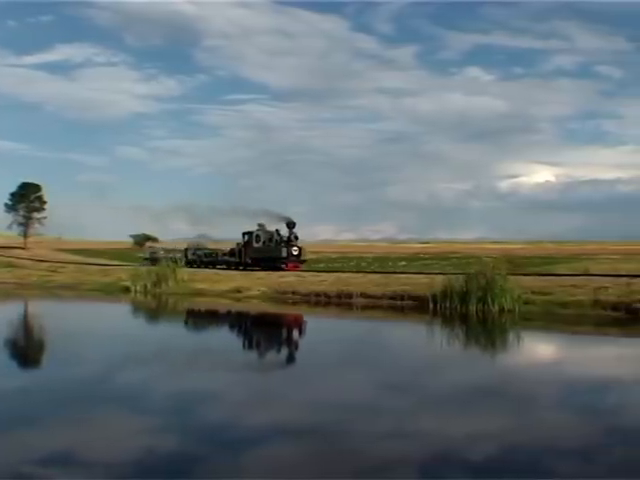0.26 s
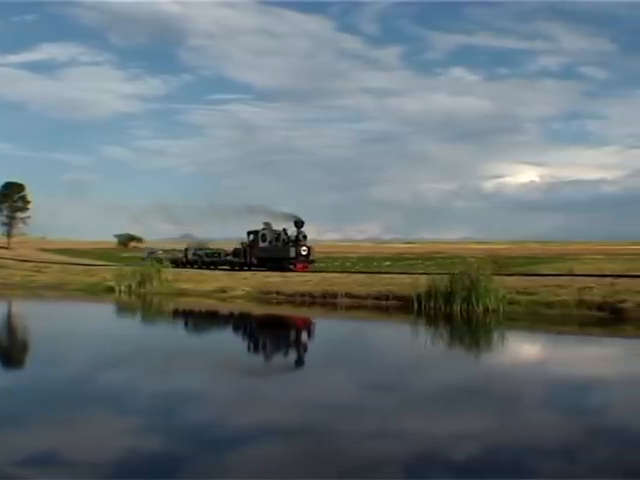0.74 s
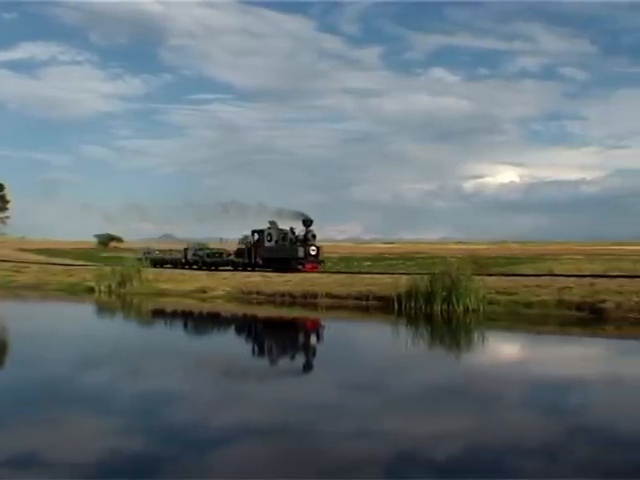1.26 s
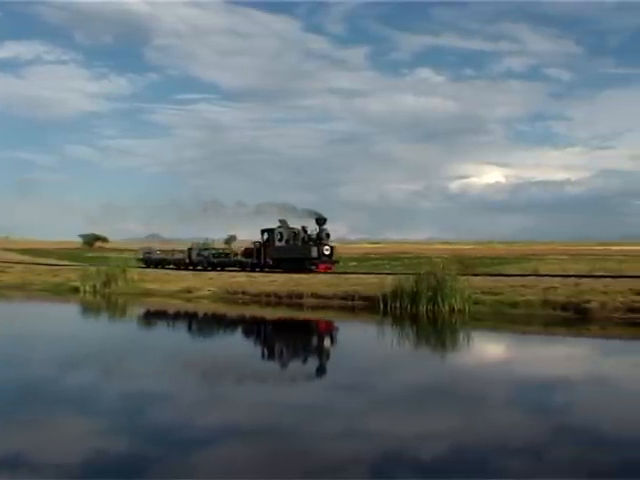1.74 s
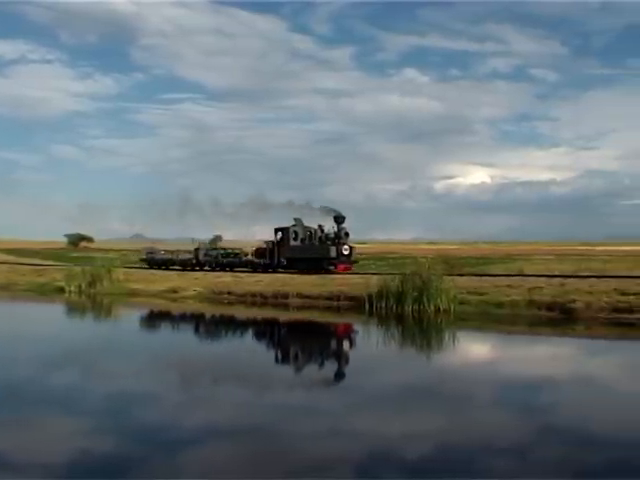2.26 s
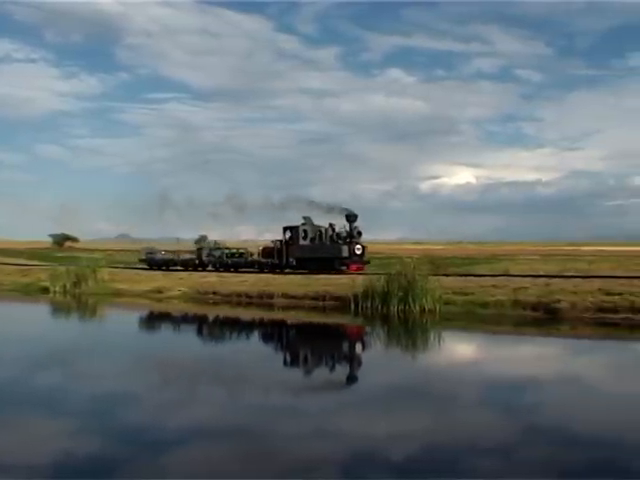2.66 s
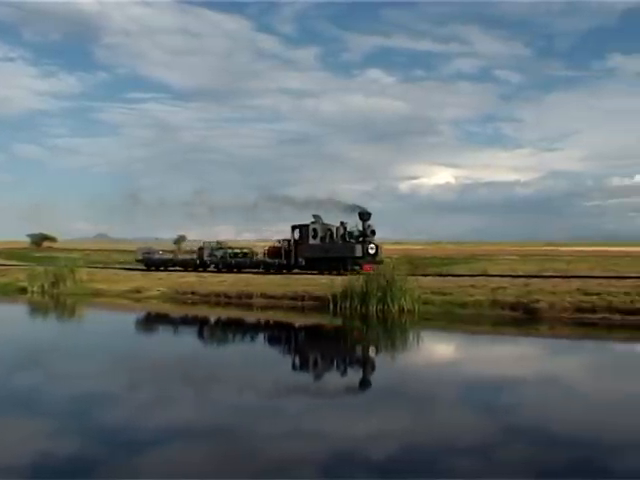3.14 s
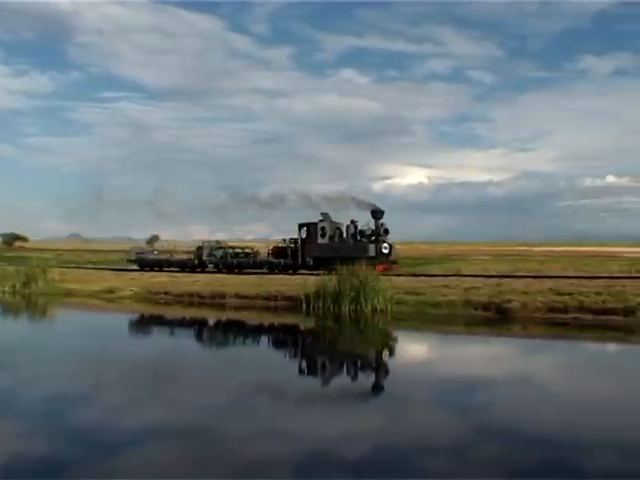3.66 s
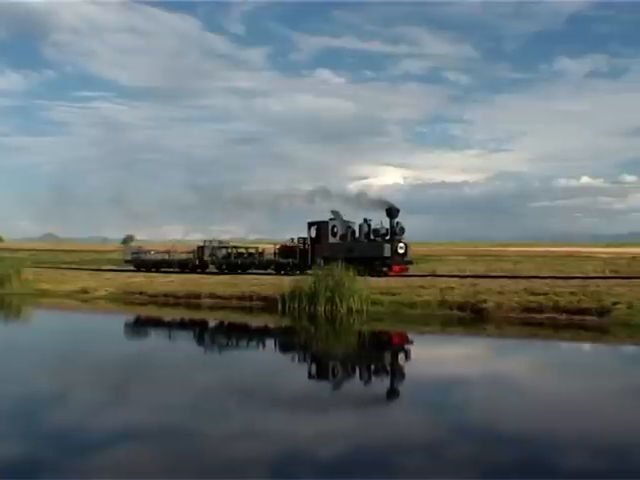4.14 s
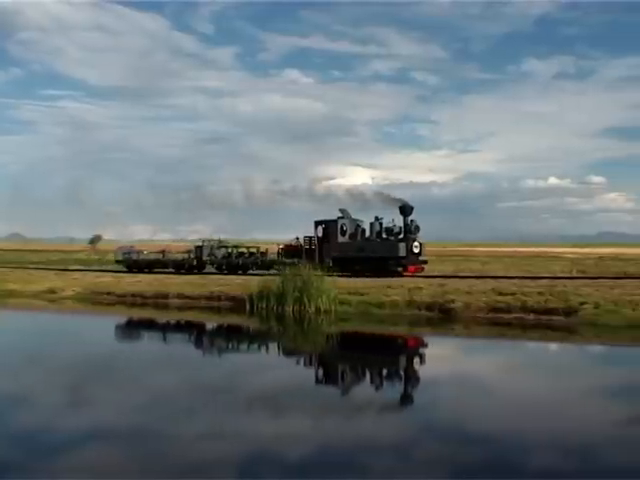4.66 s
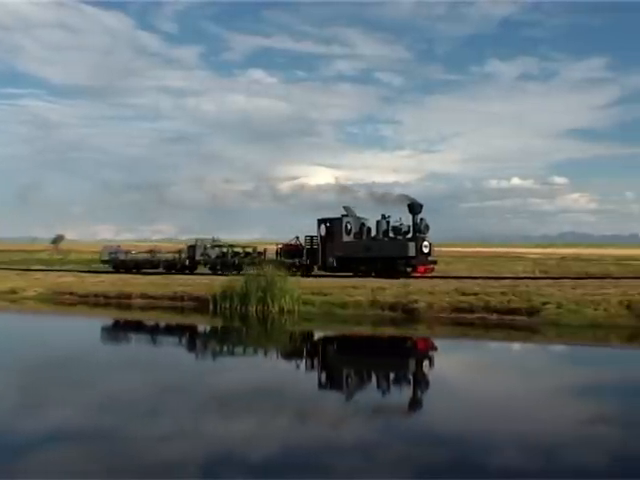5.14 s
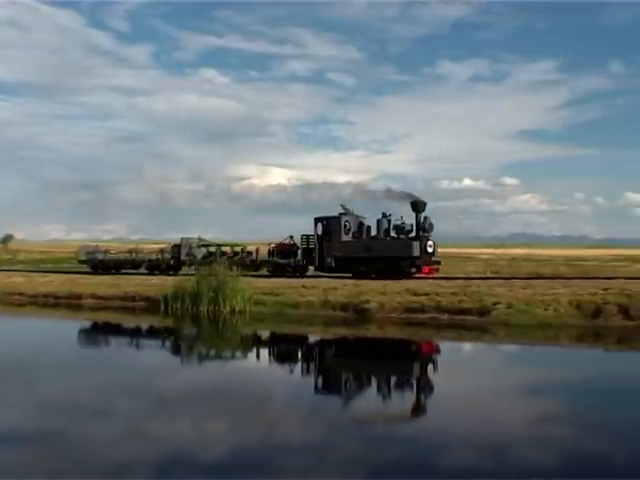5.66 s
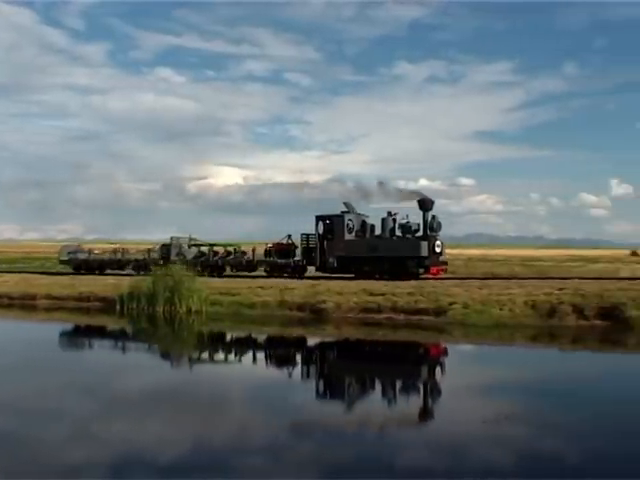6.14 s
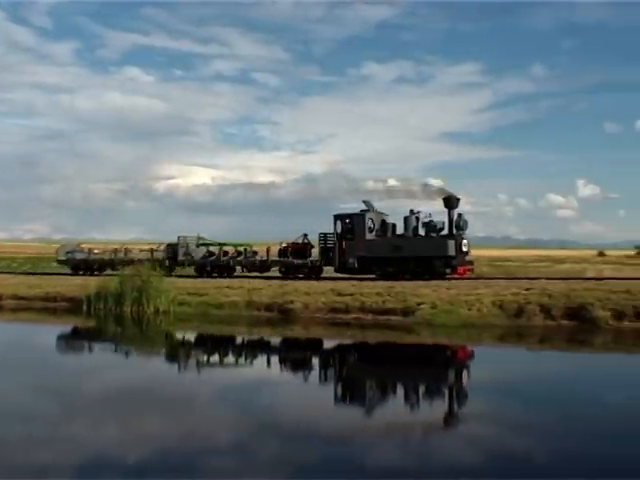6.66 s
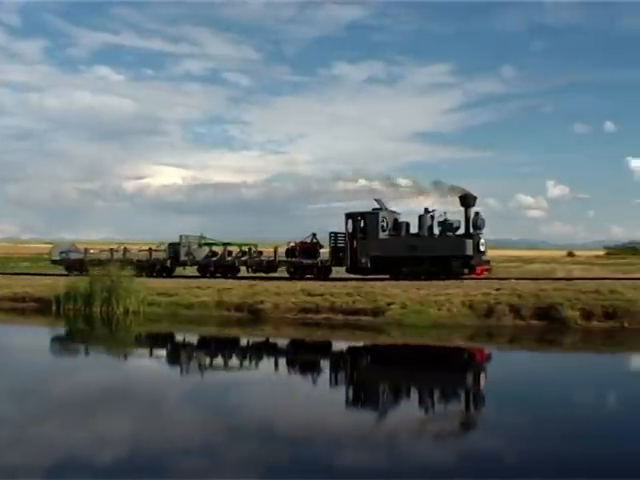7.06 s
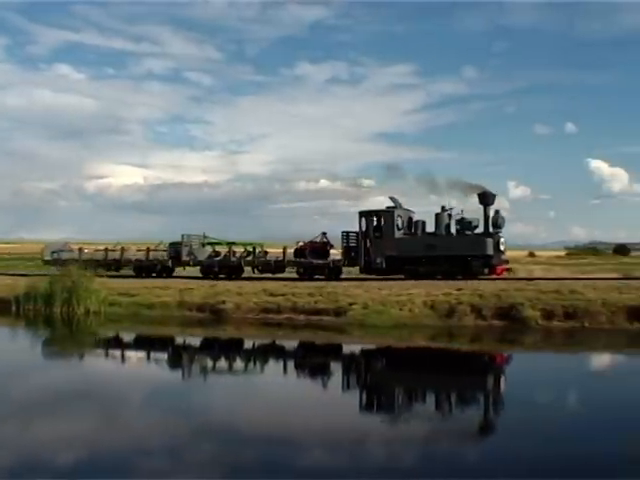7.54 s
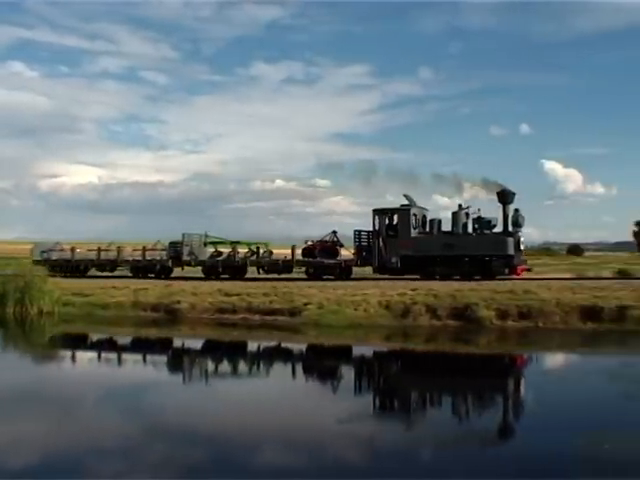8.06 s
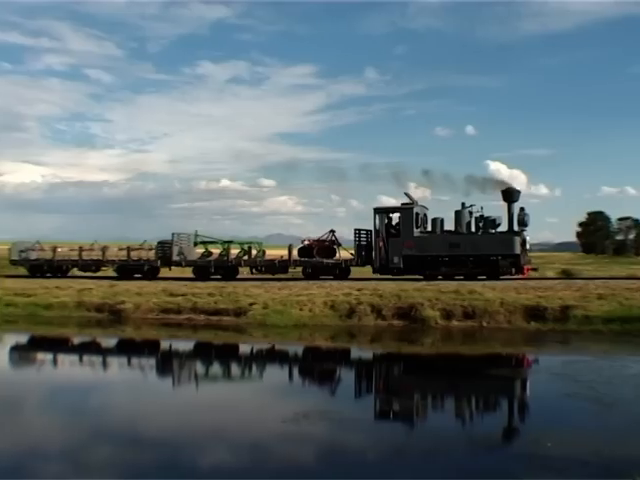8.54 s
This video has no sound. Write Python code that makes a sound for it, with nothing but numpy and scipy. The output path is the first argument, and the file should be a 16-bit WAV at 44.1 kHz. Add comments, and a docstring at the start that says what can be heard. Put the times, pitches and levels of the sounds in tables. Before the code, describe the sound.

Wagons rumble, rattle and knock over rail joints across a pond; one nearly four-second steam whistle blasts, cracking upward three times, then stops abruptly.

```python
"""Open ground, across a pond from a narrow-gauge line: a steam train rolls closer to the microphone.
One long steam whistle is a stack of gliding sine partials in a rush of coloured noise; harder pulls on
the cord overblow it three times into a higher, shriller note, while the gain turns everything down.
Wagons rumble as swelling noise, knock on rail joints as blows to resonant frames, and scrape.
A thin high hiss strengthens, far echoes trail the whistle, and the wagons clatter on after it."""
import sys
import numpy as np
from scipy import signal
from scipy.fft import rfft, irfft, next_fast_len
from scipy.io import wavfile
from scipy.ndimage import uniform_filter1d, minimum_filter1d, map_coordinates

SR = 44100
rng = np.random.default_rng(int(sys.argv[2]) if len(sys.argv) > 2 else 0)


def store_pcm(level_fs):
    """Save levels as 16-bit WAV."""
    pcm = np.round(np.clip(level_fs, -1, 1) * 32767).astype(np.int16)
    wavfile.write(sys.argv[1], SR, np.atleast_2d(pcm).T)


N = 388080

# plain note before scoop and bends, wavering slightly: (time [s], pitch [Hz])
PLAIN_PITCH = [(4.38, 1272), (4.5, 1266), (4.62, 1309), (4.7, 1285), (4.93, 1309), (5.06, 1306),
               (5.3, 1296), (5.62, 1280), (6.12, 1293), (6.25, 1285), (6.31, 1303), (6.5, 1287),
               (6.66, 1288), (6.85, 1288), (7.06, 1290), (7.36, 1304), (7.6, 1298), (7.9, 1299)]
# plain note, its strength passing to the octave and back:
# (time [s], fundamental [dB], octave [dB], twelfth [dB])
PLAIN_PARTIALS = [(4.36, -6, -32, -43), (4.6, -8, -30.5, -38.5), (4.85, -8, -38.5, -32.5),
                  (5.05, -8, -36.5, -44.5), (5.38, -9, -30, -27), (5.5, -12.5, -37.5, -29.5),
                  (5.7, -11, -26.5, -23.5), (6.05, -10, -27.5, -29), (6.42, -11.5, -25.5, -29.5),
                  (6.58, -10.5, -19, -35), (6.76, -22.5, -19.5, -33), (7.04, -20.5, -17, -34),
                  (7.1, -9.5, -16, -28.5), (7.36, -20, -22, -34), (7.58, -18.5, -20.5, -38),
                  (7.8, -11, -20, -24), (7.92, -9, -25, -39), (8.1, -10.5, -31, -31.5)]
# harder pulls on the cord, bending the note up until it overblows:
# (start [s], top [s], end [s], bend [Hz], overblown from [s], overblown until [s],
#  hoarseness before the flip [dB], added steam rush [dB], added fizz [dB])
PULLS = [(5.635, 5.87, 6.04, 76, 5.778, 5.962, 6, 2.5, -2),
         (7.07, 7.262, 7.325, 124, 7.11, 7.312, -1, 1, 10.5),
         (7.895, 8.025, 8.112, 121, 7.928, 8.096, -6, -1, 11.5)]
# higher modes of the pipe: (centre [Hz], half width [Hz], level [dB])
UPPER_MODES = [(5530, 440, -29), (6730, 330, -31), (8220, 280, -35.5), (9540, 170, -37.5),
               (11040, 270, -42.5), (12550, 320, -46.5), (13600, 320, -50), (15300, 400, -56)]
# hoarse skirts round the third mode: (offset [Hz], relative level per Hz [dB])
EDDIES = [(20, -6.0), (100, 4), (280, -13), (480, 0), (900, -24), (3000, -81)]
# colour of the steam stirring the pipe's lowest resonance: (frequency [Hz], relative level per Hz [dB])
BREATHY_COLOUR = [(100, -72), (500, -35), (750, -26.5), (900, -8.5), (1050, 1.5), (1200, 2.5), (1400, -0.5),
                  (1600, -7), (1800, -19), (2300, -30), (5000, -91)]
# colour of the steam jet over the lip: (frequency [Hz], relative level per Hz [dB])
JET_COLOUR = [(60, -43), (600, -3), (1300, 7), (2000, -2), (2500, 3.5), (3100, -1.5), (3700, 2),
              (4400, 1.5), (5100, -4), (6000, -1.5), (7000, -11), (7900, -8), (8900, -31.5), (15000, -72)]
# colour of the steam's top fizz and of the far treble: (frequency [Hz], relative level per Hz [dB])
FIZZ_COLOUR = [(1000, -61), (4000, -25), (7000, -5.5), (8100, 8.5), (8950, -1), (9750, 5), (10500, -5),
               (11400, 3), (12200, -6.5), (13300, -1.5), (14400, -13), (15700, -17)]
# the steam's top fizz, before the pulls add to it: (time [s], level [dB])
FIZZ_LEVEL = [(4.39, -55.5), (4.65, -53.5), (4.77, -47.5), (5.05, -46), (5.2, -55), (5.32, -42.5),
              (5.5, -51.5), (5.72, -39.5), (6.08, -49.5), (6.4, -46.5), (6.85, -48.5), (7.03, -41.5),
              (7.6, -45), (8.1, -46)]
# ground bounce, lagging more as the engine nears: (time [s], lag [ms])
GROUND_LAG = [(4.3, 0.845), (5.0, 0.91), (5.9, 1.029), (6.7, 1.125), (7.6, 1.197), (8.1, 1.255)]
# low thumps of the gain control while the whistle sounds: (time [s], 1/e half length [s], level [dB])
GAIN_THUMPS = [(4.36, 0.036, -41), (4.582, .05, -40), (4.73, 0.088, -38.5), (5.018, 0.092, -41),
               (5.328, .06, -46), (5.76, 0.055, -39.5), (5.99, 0.055, -46), (6.201, 0.041, -56),
               (6.6, .04, -56), (7.103, 0.043, -40), (7.27, .05, -46), (7.94, 0.059, -44)]
# colour of the gain control's thumps: (frequency [Hz], relative level per Hz [dB])
GAIN_THUMP_COLOUR = [(10, -1.5), (25, 5), (55, -4.5), (100, -9.5), (200, -30), (1000, -92)]
# changing level of the rolling, dipping just after the first overblow, before lurches and jolts:
# (time [s], rumble [dB], clatter [dB], hiss [dB])
ROLLING_LEVELS = [(0, -35.5, -40.5, -47), (1.0, -36, -38.5, -47.5), (1.6, -34.5, -38.5, -44),
                  (2.3, -32.5, -39, -43.5), (3.5, -34, -40.5, -43.5), (4.3, -33, -38, -41.5),
                  (5.1, -34.5, -38.5, -35.5), (5.6, -32, -36.5, -39), (6.0, -34.5, -41, -56),
                  (6.6, -31.5, -39.5, -37), (7.5, -33, -46, -37.5), (8.2, -35, -42.5, -39.5),
                  (8.8, -32.5, -42, -41.5)]
# lurches that swell the rolling: (time [s], 1/e half length [s], rumble [dB], clatter [dB], hiss [dB])
LURCHES = [(.005, 0.02, 8.5, 3, 7.5), (0.085, 0.032, 2, 6.5, -5), (0.397, .03, 2, 0, 2),
           (0.622, 0.055, 3.5, 3.5, 3.5), (0.83, 0.057, 2.5, -0.5, 2.5), (1.23, 0.08, 4, -0.5, 2.5),
           (1.352, 0.02, 1, 7.5, 3.5), (1.455, 0.04, 4.5, 7.5, 6), (1.655, 0.021, 2, 8, 5),
           (2.331, .018, 1, 10, 1.5), (2.55, 0.036, 1.5, 4.5, 0.5), (2.78, 0.011, 5, 0, 1.5),
           (3.068, 0.026, 4, 6.5, 5.5), (3.19, 0.033, 5, 5, 0.5), (3.793, 0.072, 2, 2, 3.5),
           (4.41, 0.016, 4, -6, 5), (5.71, .03, 4, -5, 0), (7.372, .02, 5, 5, -1),
           (7.483, 0.032, 5, -7, -3), (8.427, 0.024, 4, 4, 8.5), (8.575, 0.038, 0.5, -1, 1.5)]
# colour of the wheels' rumble: (frequency [Hz], relative level per Hz [dB])
RUMBLE_COLOUR = [(10, -81), (30, -51.5), (60, -34.5), (100, -19), (160, -10), (240, -2), (330, 0.5),
                 (450, -4.5), (600, -7.5), (900, -15.5), (1600, -54), (5000, -100)]
# colour of the wagons' clatter: (frequency [Hz], relative level per Hz [dB])
CLATTER_COLOUR = [(40, -76), (300, -19), (550, 2), (800, 4.5), (1150, 1.5), (1450, -10), (2000, -13),
                  (3200, -39), (9000, -76.5)]
# colour of the rolling hiss: (frequency [Hz], relative level per Hz [dB])
HISS_COLOUR = [(60, -80), (1200, -1), (2000, 0), (2550, 0), (3200, -2), (3900, -5.5), (4500, -3.5),
               (5600, -10.5), (6300, -13.5), (7200, -25), (7950, -25), (8700, -31), (9700, -32.5),
               (15500, -44)]
# rattling steel fittings: (centre [Hz], width [Hz], relative level [dB])
FITTINGS = [(2450, 170, -3.5), (3824, 130, -2), (4210, 160, -6.5), (5200, 57, -6), (6180, 81, -9.5),
            (7960, 170, -22), (9400, 450, -35)]
# wheels on rail joints: (time [s], knock level [dB], clank relative to the thud [dB])
JOINTS = [(0.002, -33, -10), (0.08, -22.5, -12), (0.8, -20, -6), (1.008, -27.5, -19), (1.16, -20.5, -12),
          (1.425, -25, -5), (1.556, -20, -6), (1.633, -23.5, -3), (2.097, -28, 3.5), (2.175, -24.5, -6),
          (2.304, -21.5, -1), (2.386, -22.5, -3), (2.754, -26, -16), (2.908, -27, 0.5), (2.957, -24, -1.5),
          (3.037, -26.5, -6.5), (3.174, -19, -4.5), (3.26, -24.5, 0), (3.732, -15.5, -12),
          (3.819, -22.5, -2), (4.042, -23, -3), (4.275, -22, -17), (5.507, -27, 7), (6.17, -20, -8.5),
          (6.638, -22, -10), (7.357, -15, -9), (7.604, -14.5, -11), (8.377, -14.5, -6), (8.638, -17.5, -5)]
# wagon frame resonances: (centre [Hz], width [Hz], relative level [dB])
WAGON_FRAME = [(215, 40, -2.5), (277, 42, 3), (367, 82, -0.5), (448, 107, -2.5), (666, 150, -11)]
# colour of the steel clank: (frequency [Hz], relative level per Hz [dB])
CLANK_COLOUR = [(30, -69), (300, -24), (600, 5), (1100, 5.5), (1600, -9), (2600, -9.5), (4500, -11),
                (6500, -23.5), (9000, -50), (15000, -60)]
# short scrapes of steel: (time [s], 1/e half length [s], centre [Hz], width [octaves], level [dB])
SCRAPES = [(0.329, 0.016, 5400, 0.23, -38), (1.321, 0.0088, 4250, .3, -36),
           (1.449, 0.022, 3440, 0.53, -37.5), (1.556, 0.0069, 5570, 0.2, -42),
           (1.845, 0.012, 4900, 0.25, -41), (2.074, 0.018, 4750, .2, -40), (2.458, 0.018, 4600, 0.32, -40),
           (3.31, .02, 6960, .03, -58), (8.431, 0.022, 2700, 0.98, -42), (8.452, .016, 7950, 0.028, -51)]
# thin high hiss, stronger as the train nears: (time [s], level [dB])
FAR_TREBLE_LEVEL = [(0, -84.5), (4.3, -78), (8.2, -59.5), (8.8, -62)]
# far echoes over the open ground: (frequency [Hz], decay by 60 dB [s])
FIELD_DECAY = [(200, .3), (1300, 0.92), (2700, 0.62), (4100, 0.62), (6000, .3), (12000, .2)]

OPEN_S, SHUT_S = 4.336, 8.113  # the whistle valve
BUILD_S = 0.18  # time constant of the pressure building in the steam
SCOOP_HZ, SCOOP_S = 322.8, 0.011  # the note starts flat and scoops up: depth, time constant
SETTLE_HZ, SETTLE_S = 44.62, 0.05  # then creeps the rest of the way
FLIP_S, LOCK_HZ = 0.0032, 14  # time scale of the register flip; the overblown note locks a little flat
THIRD_HZ, THIRD_WIDTH_HZ, THIRD_DB = 4042, 232, -10  # third mode: centre, half width, level when in tune
# overblown: the fundamental, what the third mode takes from it in tune, the octave in tune
FIRST_DB, ROBBED_DB, OCTAVE_DB = -5, 11, -27.5
BRIGHT_HZ, BRIGHT_DB_PER_HZ = 1385, 0.013  # overblown: neutral pitch; gain per Hz above it and per partial
SURGE_DB = 9  # pipe and steam gain this much when overblown, ahead of the gain control
BREATHY_DB, JET_DB = -23.5, -26.5  # the steam at full pressure, before its swings
BREAK_LEAD_S, BREAK_S = 0.025, 0.043  # hoarseness peaks just before the flip; its 1/e half length
SPILL = 0.14  # dB of extra jet noise for each dB that the fundamental falls short of
FULL_DB = -12.5  # this level, at which the pipe takes up the whole jet
TOP_HZ = 15740  # upper band limit


def pipe(jitter_hz=4.55, flutter=0.022, upper_flutter=0.36, plain_db=-7, plain_tilt_db=-5.0):
    """The pipe's note; the turbulent jet shakes its pitch and its strength."""
    pitch, shrill = pipe_pitch(), overblow()
    first, second, third = partials(pitch, shrill)
    shaken_pitch = pitch + jitter_hz * wobble(220) + 2.495 * wobble(30)
    phase = 2 * np.pi * np.cumsum(shaken_pitch) / SR
    # the weaker the note, the more the steam unsettles it
    tone = (first + flutter * wobble(70)) * np.sin(phase)
    tone += second * amp(0.66 * wobble(90)) * np.sin(2 * phase)
    tone += third * amp(wobble(90)) * np.sin(3 * phase + 0.14 * wobble(400))
    # upper partials grow as the pressure builds and light up as they glide through the higher modes
    pressure_db = np.interp(clock(), [OPEN_S, 5.3], [-13, 0])
    bright_db = shrill * BRIGHT_DB_PER_HZ * (pitch - BRIGHT_HZ)
    for step, k in enumerate(range(4, 12)):
        modes = sum(amp(db) / (1 + ((k * pitch - hz) / width) ** 2) for hz, width, db in UPPER_MODES)
        tilt_db = (1 - shrill) * (plain_db + plain_tilt_db * step)
        drift_db = 2.5 * wobble(22)
        level = modes * amp(pressure_db + tilt_db + bright_db * step + drift_db)
        tone += level * (1 + upper_flutter * wobble(200)) * np.sin(k * phase + 0.44 * wobble(260))
    return np.sqrt(2) * (tone + unrest(phase)) * valve()


def pipe_pitch():
    """The note scoops up at the start and arches with every harder pull."""
    plain = curves(PLAIN_PITCH)[0] - SCOOP_HZ * settling(SCOOP_S) - SETTLE_HZ * settling(SETTLE_S)
    bends = 0
    for start, top, end, bend_hz, *_ in PULLS:
        pull = np.interp(clock(), [start, top, end], [0, 1, 0])
        bends = bends + bend_hz * np.sin(np.pi / 2 * pull)
    return plain + bends - LOCK_HZ * overblow()


def partials(pitch, shrill):
    """Lowest three strengths; the better the third mode is in tune, the more it robs the fundamental."""
    plain = amp(curves(PLAIN_PARTIALS))
    in_tune = 1 / (1 + ((3 * pitch - THIRD_HZ) / THIRD_WIDTH_HZ) ** 2)
    first = amp(FIRST_DB - ROBBED_DB * in_tune)
    blown = np.array([first, amp(OCTAVE_DB) * np.sqrt(in_tune), amp(THIRD_DB) * in_tune])
    return (1 - shrill) * plain + shrill * blown


def overblow():
    """0 for the plain note, 1 when the pipe's third mode takes over."""
    return sum(overblown(*pull[4:6]) for pull in PULLS)


def overblown(start, end):
    """1 while the pipe's third mode holds the note, 0 before and after."""
    return (np.tanh((clock() - start) / FLIP_S / 2) - np.tanh((clock() - end) / FLIP_S / 2)) / 2


def unrest(phase, warble_db=-30, croak_db=-28, undertone_db=-34):
    """Half-pitch tone as the pipe starts to speak; hoarse skirts as the third mode catches and holds."""
    speaking = np.interp(clock(), [OPEN_S, 4.42, 4.5], [1, 1, 0])
    undertone = amp(undertone_db) * speaking * (1 + 0.3 * wobble(60)) * np.sin(phase / 2)
    croak = 0
    for *_, start, end, break_db, rush_db, fizz_db in PULLS:
        croak = croak + amp(croak_db + break_db) * swell(start - BREAK_LEAD_S, BREAK_S)
    # low noise times the third partial makes skirts on both sides of it
    return undertone + (amp(warble_db) * overblow() + croak) * noise(EDDIES) * np.sin(3 * phase)


def valve(rise=0.016, fall=0.024):
    """The whistle valve snaps open and shut."""
    return np.clip((clock() - OPEN_S) / rise, 0, 1) * np.clip((SHUT_S - clock()) / fall, 0, 1)


def settling(seconds):
    """1 as the valve opens, dying away afterwards."""
    return np.exp(-np.maximum(clock() - OPEN_S, 0) / seconds)


def steam(breathy_lack_db=12, jet_lack_db=13, breathy_loss_db=5.0, drift_db=1.16):
    """The jet rushes over the lip and stirs the lowest resonance; what the note leaves spills as noise."""
    lack = settling(BUILD_S)
    spill_db = SPILL * np.maximum(FULL_DB - curves(PLAIN_PARTIALS)[0], 0)
    flow_db = drift_db * wobble(9)
    fizz_db, = curves(FIZZ_LEVEL)
    hoarse_db = 0
    for *_, start, end, break_db, rush_db, sizzle_db in PULLS:
        shrill = overblown(start, end)
        hoarse_db = hoarse_db + break_db * swell(start - BREAK_LEAD_S, BREAK_S)
        flow_db = flow_db + rush_db * shrill
        fizz_db = fizz_db + sizzle_db * shrill
    breathy_db = BREATHY_DB - breathy_lack_db * lack + flow_db - breathy_loss_db * overblow()
    jet_db = JET_DB - jet_lack_db * lack + flow_db + spill_db + hoarse_db
    breathy = amp(breathy_db) * patchy(noise(BREATHY_COLOUR), depth_db=0.5)
    jet = amp(jet_db) * patchy(noise(JET_COLOUR), depth_db=2.03)
    fizz = amp(fizz_db) * patchy(noise(FIZZ_COLOUR), depth_db=0.7)
    return bounced(breathy + jet + fizz) * valve()


def bounced(x, strength=0.66):
    """Direct sound plus its ground bounce: a comb of notches slides down as the engine nears."""
    lag_ms, = curves(GROUND_LAG)
    late = map_coordinates(x, [np.arange(N) - lag_ms * SR / 1000])
    return (x + strength * late) / np.hypot(1, strength)


def rolling(rattles=70, rattle_db=-6.0):
    """Wheels rumble through the wagon frames; loose fittings, tapped at random, rattle over a hiss."""
    lurch_db = sum(np.outer(dbs, swell(s, length)) for s, length, *dbs in LURCHES)
    rumble_db, clatter_db, hiss_db = curves(ROLLING_LEVELS) + lurch_db
    jolt = wobble(45)  # bumps in the track shake everything together
    rumble = amp(rumble_db + 0.71 * jolt) * patchy(noise(RUMBLE_COLOUR), depth_db=0.3)
    clatter_db = clatter_db + 2.3 * jolt + 1.2 * wobble(160)
    clatter = amp(clatter_db) * patchy(noise(CLATTER_COLOUR), depth_db=-0.5)
    # rattles: mean taps per second
    taps = (rng.random(N) < rattles / SR) * amp(0.96 * rng.standard_normal(N))
    tap_decay = np.exp(-clock()[:SR // 10] / 0.011)
    chatter = signal.fftconvolve(taps, tap_decay)[:N] * rng.standard_normal(N)
    hiss = patchy(noise(HISS_COLOUR), depth_db=1.74) * amp(0.61 * jolt + 1.57 * wobble(180))
    hiss += amp(rattle_db) * unit(ring(chatter, FITTINGS))
    return rumble + clatter + amp(hiss_db) * hiss


def joints(thud_t60=0.09, clank_t60=0.14, blow=6.5, low_hz=110):
    """Each wheel drops into a joint: one hard blow, then the frame shudders and the steel clanks."""
    blows, thud, clank = np.zeros((3, N))
    for s, db, clank_db in JOINTS:
        start = max(round(s * SR), 0)
        t = clock()[:min(SR // 3, N - start)]
        blows[start] = amp(db) * blow
        thud[start:start + len(t)] += amp(db - 60 * t / thud_t60)
        clank_rise = 1 - np.exp(-t / 0.0015)
        clank[start:start + len(t)] += amp(db + clank_db - 60 * t / clank_t60) * clank_rise
    white = rng.standard_normal(N)
    body = ring(blows + amp(-3.5) * thud * white, WAGON_FRAME) / np.std(ring(white, WAGON_FRAME))
    # the frame radiates only its middle range
    body = filtered(body, lambda hz: (1j * hz / (low_hz + 1j * hz)) ** 2 / (1 + 1j * hz / 2500))
    return body + amp(-3.5) * clank * noise(CLANK_COLOUR)


def scrapes():
    """Steel rubs on steel in short, bright strokes of band noise."""
    out, hz = np.zeros(N), np.fft.rfftfreq(SR, 1 / SR)
    for s, length, centre_hz, octaves, db in SCRAPES:
        response = np.exp(-0.5 * (np.log2((hz + 1) / centre_hz) / octaves) ** 2)
        band = irfft(rfft(rng.standard_normal(SR)) * response)
        out += amp(db) * np.resize(unit(band), N) * swell(s, length)
    return out


def far_treble():
    """A thin, patchy high hiss that strengthens as the train nears."""
    level_db, = curves(FAR_TREBLE_LEVEL)
    return amp(level_db) * patchy(noise(FIZZ_COLOUR), depth_db=7.0)


def echoes(x):
    """The open ground scatters a tail back, each frequency decaying at its own rate."""
    hz, t, z = signal.stft(rng.standard_normal(SR), SR, nperseg=256)
    decay = amp(-60 * t / along(FIELD_DECAY, hz)[:, None])
    tail = signal.istft(z * decay, SR, nperseg=256)[1]
    return signal.fftconvolve(x, tail / np.linalg.norm(tail))[:N]


def gain_thumps(push=0.1, push_s=4.353, push_length=0.007, bed_db=-53, fade_db_per_s=4):
    """Low thumps of the recorder's gain control while the whistle sounds: a push, a fading bed, bumps."""
    bed_gate = np.interp(clock(), [OPEN_S, OPEN_S + 0.01, SHUT_S, SHUT_S + 0.3], [0, 1, 1, 0])
    bed = amp(bed_db - fade_db_per_s * (clock() - OPEN_S)) * bed_gate
    thumps = sum(amp(db) * swell(s, length) for s, length, db in GAIN_THUMPS) * valve()
    return (bed + thumps) * noise(GAIN_THUMP_COLOUR) - push * swell(push_s, push_length)


def amp(db):
    """Decibels to gain."""
    return np.exp(np.asarray(db) * (np.log(10) / 20))


def unit(x):
    """Scaled to rms 1."""
    return x / np.sqrt(np.mean(x ** 2) + 1e-20)


def clock():
    """The time of each sample [s]."""
    return np.arange(N) / SR


def along(points, hz):
    """(frequency [Hz], value) points interpolated on a log axis."""
    f, v = np.transpose(points)
    return np.interp(np.log(hz + 1), np.log(f + 1), v)


def curves(rows):
    """One value per sample for each column after the time."""
    s, *cols = np.transpose(rows)
    return [np.interp(clock(), s, c) for c in cols]


def wobble(rate):
    """A smooth random curve, rate knots a second."""
    coarse = np.arange(0, N + 32, 32)
    knots = rng.standard_normal(int(N * rate / SR) + 4)
    return np.interp(np.arange(N), coarse, map_coordinates(knots, [coarse * rate / SR]))


def swell(s, length):
    """A bell-shaped rise and fall round time s."""
    near = np.arange(max(int((s - 4 * length) * SR), 0), min(int((s + 4 * length) * SR), N))
    out = np.zeros(N)
    out[near] = np.exp(-((near / SR - s) / length) ** 2)
    return out


def filtered(x, response):
    """x times a complex response of frequency."""
    m = next_fast_len(N + SR // 2)
    return irfft(rfft(x, m) * response(np.fft.rfftfreq(m, 1 / SR)), m)[:N]


def noise(spectrum):
    """Noise of rms 1 with the given colour."""
    return unit(filtered(rng.standard_normal(N), lambda hz: amp(along(spectrum, hz))))


def patchy(x, depth_db):
    """Turbulence makes patches of the spectrum swell and fade."""
    z = signal.stft(x, nperseg=512)[2]
    patch = np.outer(np.hanning(9), np.hanning(25))  # frequency bins by time frames
    field = signal.fftconvolve(rng.standard_normal(z.shape), patch, "same")
    return unit(signal.istft(z * amp(depth_db * unit(field)), nperseg=512)[1][:N])


def ring(x, modes):
    """x through a body's resonances, neighbours in opposite phase."""
    def response(f):
        return sum((-1) ** k * amp(db) * 1j * f * w / (c * c - f * f + 1j * f * w)
                   for k, (c, w, db) in enumerate(modes))
    return filtered(x, response)


def scene():
    """Whistle and train, heard from across a pond."""
    whistle = (pipe() + steam()) * amp(SURGE_DB * overblow())
    train = rolling() + joints() + scrapes() + far_treble()
    return (whistle + amp(-32.5) * echoes(whistle) + gain_thumps() + train)[None]


def record(dry, ceiling=0.91, threshold_db=-13, range_db=8.5, treble_hz=3000):
    """Microphone gain backs off on shrill treble, a limiter holds the peaks, a band limit cuts the top."""
    treble = filtered(dry[0], lambda hz: hz > treble_hz)
    treble_db = 10 * np.log10(np.abs(uniform_filter1d(treble ** 2, size=440)) + 1e-12)
    x = dry[0] * amp(-np.clip(treble_db - threshold_db, 0, range_db))
    needed = np.minimum(1, ceiling / (np.abs(x) + 1e-9))
    gain = uniform_filter1d(minimum_filter1d(needed, size=440), size=220)
    return filtered(x * gain, lambda hz: hz < TOP_HZ)[None]


dry = scene()
out = record(dry)
store_pcm(out)
```